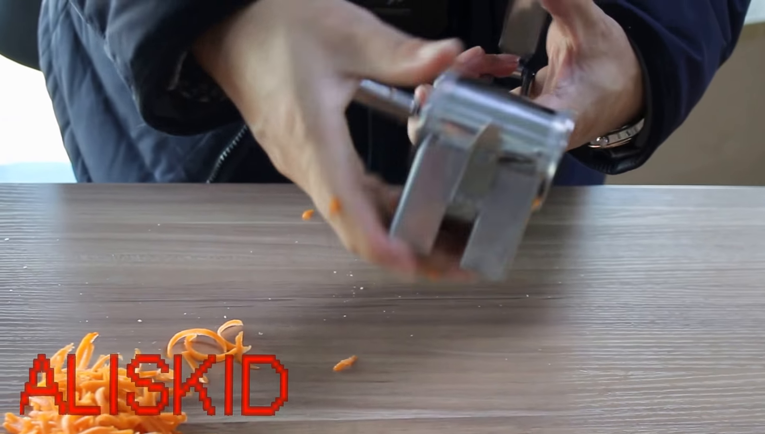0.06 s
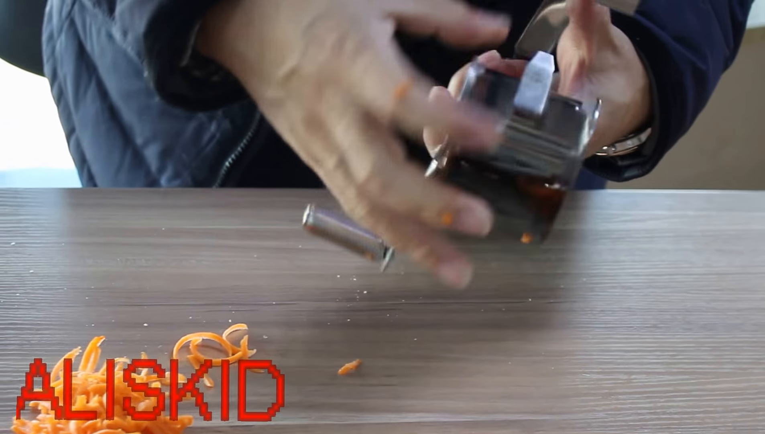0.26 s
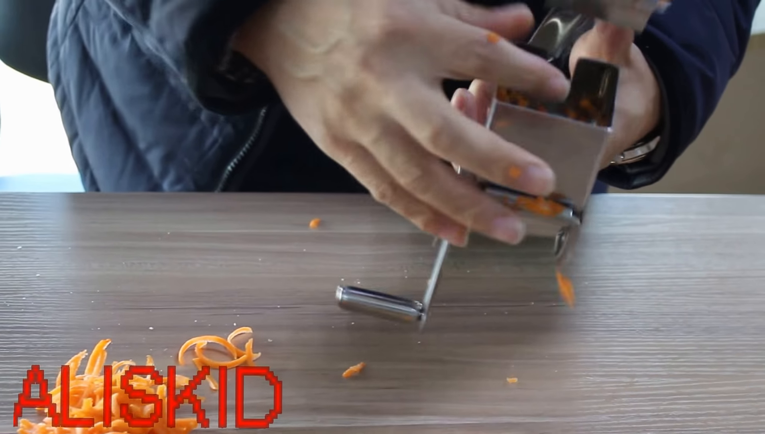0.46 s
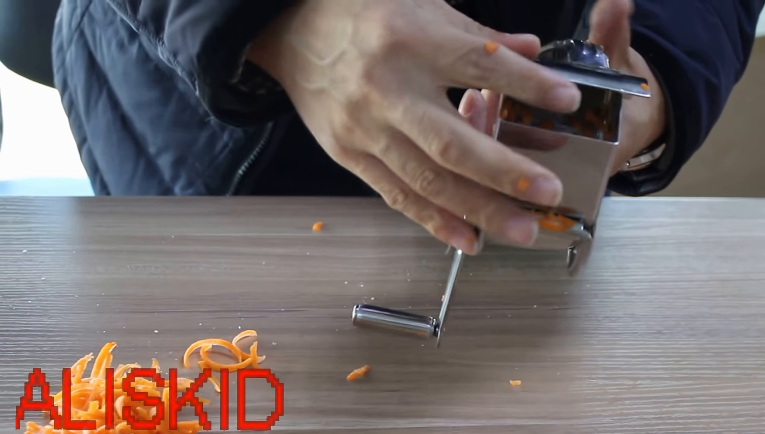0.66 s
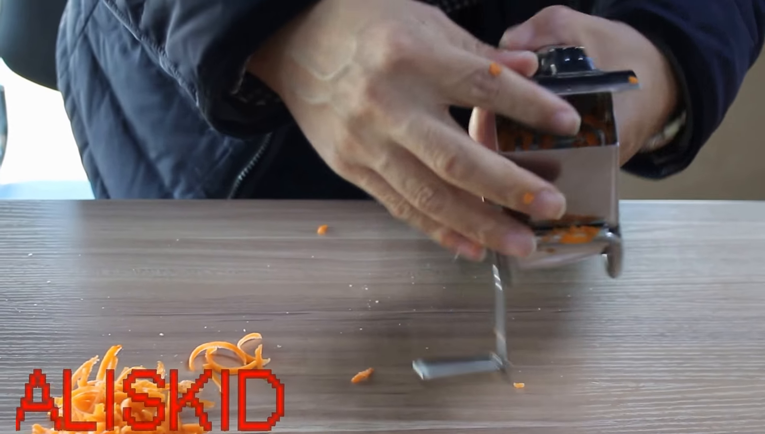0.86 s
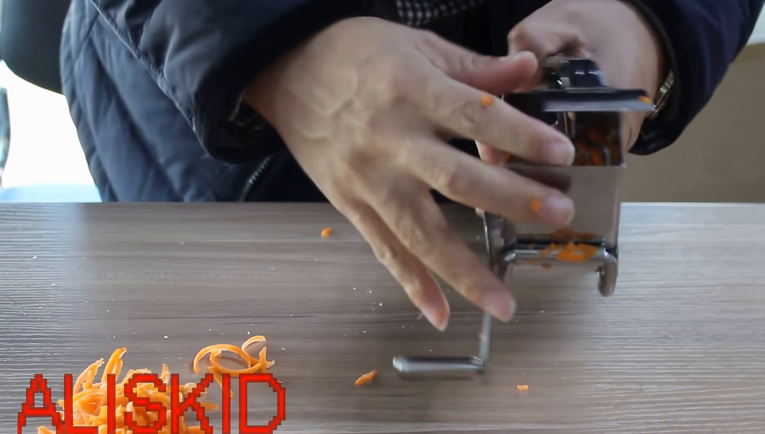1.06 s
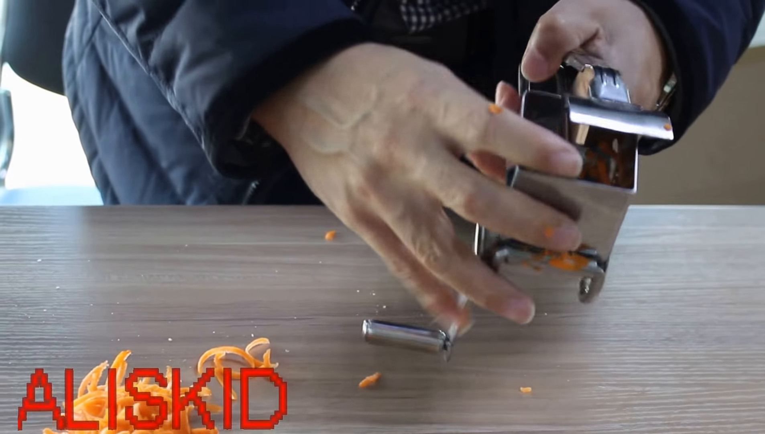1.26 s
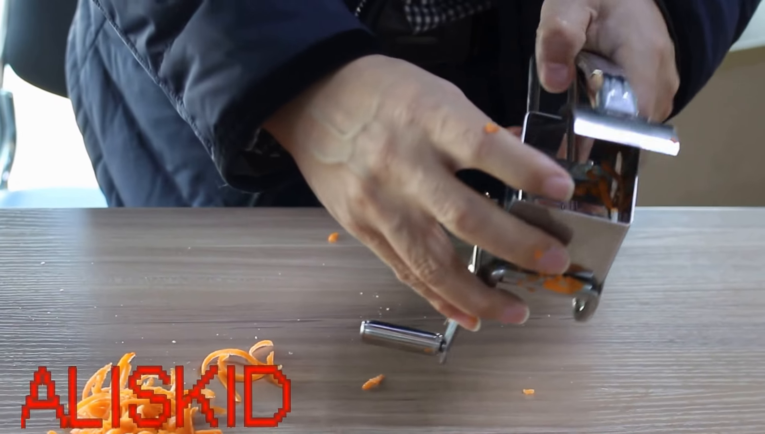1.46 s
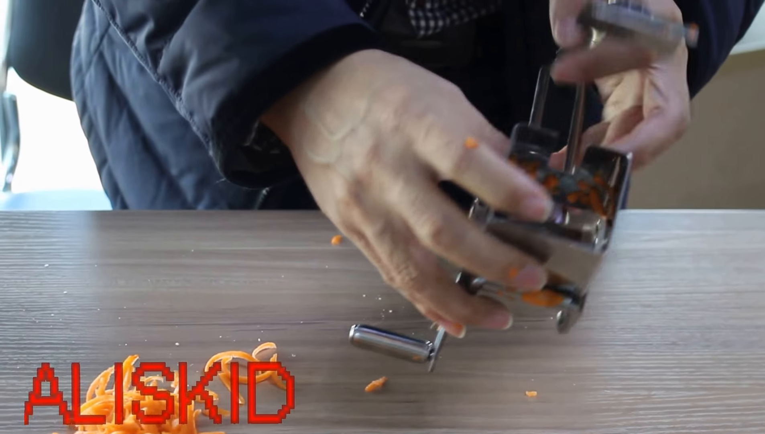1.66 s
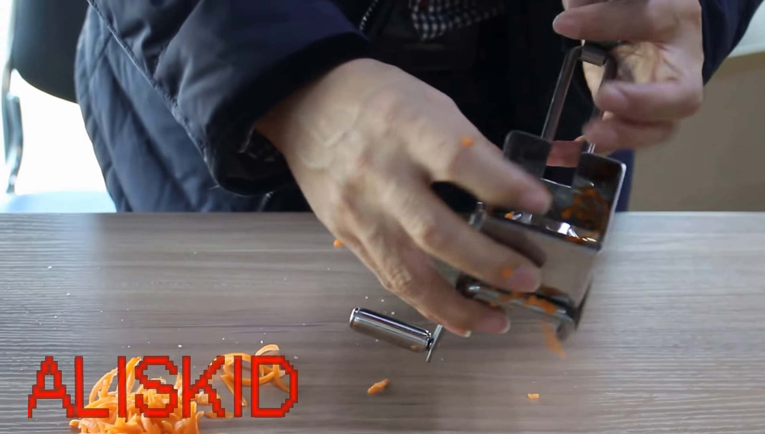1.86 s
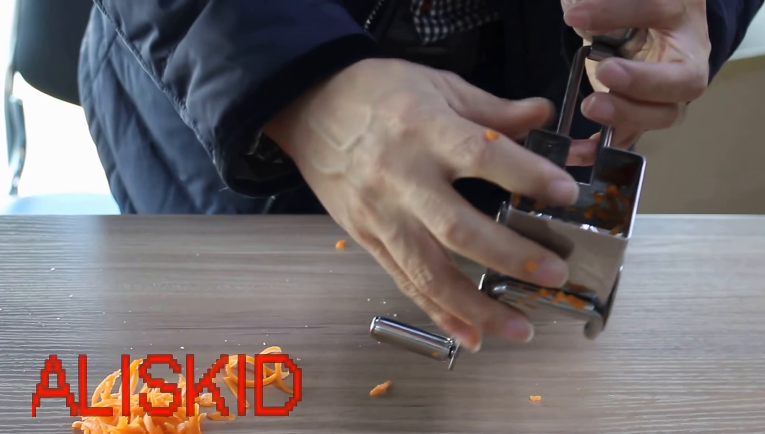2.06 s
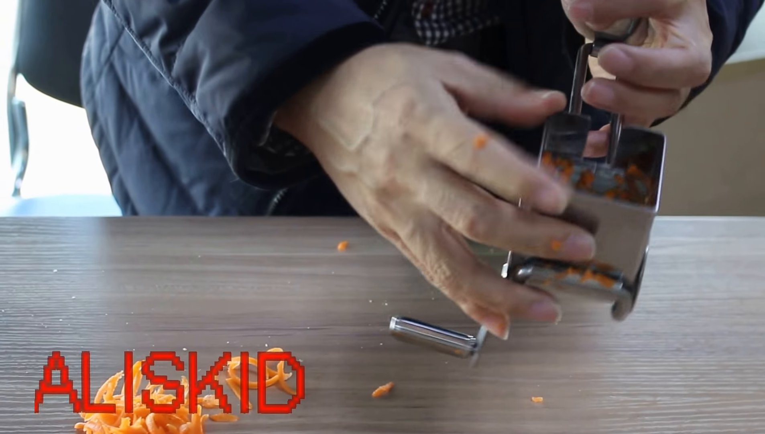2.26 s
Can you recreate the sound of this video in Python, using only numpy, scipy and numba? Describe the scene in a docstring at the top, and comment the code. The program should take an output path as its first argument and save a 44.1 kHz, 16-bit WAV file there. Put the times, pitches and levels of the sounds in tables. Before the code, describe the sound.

Loose metal parts of a hand grater clatter in a quick, ringing burst, settle into soft ticks, then clink again more lightly as it opens. The sound is near, with a short room echo and a low ventilation hum behind.

```python
"""A steel rotary grater is turned over in the hands and opened in a small, live room.
Loose crank and drum clank against the sheet-metal housing; the hinged presser then clinks as it lifts.
Each blow is a contact crack, a shimmer of fine sheet modes and a ring of main modes; a few also thud.
Ventilation hums behind. Gain control ducks the level after the hardest blows."""
import sys
import numpy as np
from scipy import signal
from scipy.fft import rfft, irfft
from scipy.io import wavfile
from scipy.ndimage import uniform_filter1d
from numba import njit

SR = 44100
rng = np.random.default_rng(int(sys.argv[2]) if len(sys.argv) > 2 else 0)


def master(y):
    """Save y as 16-bit WAV."""
    cut = np.clip(np.atleast_2d(y).T, -1, 1)
    pcm = np.round(cut * 32767)  # scale
    wavfile.write(sys.argv[1], SR, pcm.astype(np.int16))


N = 101429

# Blows: t/s, crack/dB, shimmer/dB, ring/dB, favoured f/Hz, its lift/dB,
# share of ring time left by the hand, tilt/(dB/octave), chatter/s
HOUSING_BLOWS = [(.001, -46, -42, -43.5, 6944, 10.5, 0.42, 3, 0.019),
                 (.0318, -30.5, -41, -57, 7750, 17, 0.67, 0.5, 0.009),
                 (.1316, -42, -52, -54.5, 2133, 13.5, 0.16, -7, .002),
                 (.1695, -34, -44.5, -66, 4380, 3, .5, -3, 0.00057),
                 (.185, -28, -34, -42.5, 1690, 16, 0.95, -7, 0.0055),
                 (.1895, -28, -33, -47.5, 4400, 21.5, 0.84, 7.5, 0.0021),
                 (.2335, -30, -27, -34.5, 2981, 15, 0.62, 4, 0.0068),
                 (.2375, -27, -24, -29, 2133, 5, 1, -3, 0.011),
                 (.2843, -2, -13.5, -18.5, 3409, 23, 0.43, 2.5, .003),
                 (.2885, -18, -12.5, -20, 3990, 28.5, 0.6, 1.5, 0.0033),
                 (.3195, -11.5, -15, -20, 2291, 22, 0.33, 2.5, 0.01),
                 (.3681, -10, -17, -24, 1690, 11.5, 0.62, 5.5, 0.013),
                 (.381, -31, -28.5, -20.5, 3004, 14.5, 0.51, 14, 0.013),
                 (.412, -30, -18, -29, 2840, 18, 0.24, 1.5, .02),
                 (.453, -30, -27, -32, 3409, 1, .7, -9, 0.0073),
                 (.4713, 3.5, -22, -21, 6010, 7.5, 0.14, 2.5, .001),
                 (.4722, -4, -29, -9.5, 2603, 8, 0.2, 0, 0.0009),
                 (.473, -1, -23, -17, 2133, 19, 0.15, -1.5, .002),
                 (.5207, -27, -18.5, -37.5, 2133, 19, 0.35, 2.5, .01),
                 (.5462, -12, -17.5, -33.5, 2850, 17, 0.46, 2, 0.016),
                 (.5581, -7, -20, -41, 2133, 26.5, 0.26, 0, .012),
                 (.594, -19, -35, -34, 2133, 8, 0.41, 1.5, 0.024),
                 (.645, -44, -58, -45, 2133, 21.5, 0.43, -6, 0.024),
                 (.7915, -51, -55, -56, 2800, 20, 0.42, -5, 0.0073),
                 (.8206, -30.5, -40.5, -58.5, 3409, 11.5, .4, -2.5, .003),
                 (.9004, -42, -48.5, -63, 2133, 13, .4, 0.5, .001),
                 (.9827, -31.5, -38.5, -56.5, 6930, 15.5, 0.84, 1, 0.002),
                 (.998, -30, -44.5, -64, 2870, -10, .6, 0.5, .015),
                 (1.3528, -46, -51.5, -76, 4380, 24, 0.62, -3.5, .006)]
PRESSER_BLOWS = [(1.455, -47, -50, -67, 2886, 4, 1, -14, .02), (1.4751, -52, -50, -63, 4160, 4, 1, -9, .02),
                 (1.5704, -33, -40, -39, 3990, 9.9, 0.51, 2.5, 0.0044),
                 (1.618, -36, -42, -53, 5940, 8, .6, 3, .01),
                 (1.6991, -28, -30, -33.5, 4160, 7.5, 0.86, 1, .002),
                 (1.7614, -16, -28.5, -32.5, 2910, 2.3, 1, -1, .004),
                 (1.7725, -22, -31, -47, 4730, 7.2, 0.67, -0.5, 0.0076),
                 (1.7834, -21.5, -29, -36, 2840, 3.6, 0.65, 1, .008),
                 (1.795, -27, -49, -64, 2145, 5, 0.45, 1, 0.0063),
                 (1.806, -40, -41, -35.5, 2900, 12.4, 0.12, -2, .004)]
# Main modes, parallel lists: f/Hz, level/dB, T60/s
HOUSING_HZ = [1690, 2053, 2133, 2291, 2450, 2799, 2865, 2981, 3050, 3409, 3800, 3998, 4135, 4400, 6540,
              6944, 7700, 9480]
HOUSING_DB = [-4, -19.5, 2, -7.5, -9.5, -2, 5.5, -3.5, -0.5, 1, -3.5, -16.5, -3.5, 0, 2.5, -8, 0.5, -14.5]
HOUSING_T60_S = [0.2, .33, 0.48, 0.26, 1, .33, 0.32, 0.16, .3, 0.44, 0.63, 0.32, .38, .18, .15, 0.66, 0.25,
                 .13]
PRESSER_HZ = [2145, 2520, 2840, 2886, 2928, 3045, 3420, 3835, 4010, 4160, 4486, 4813, 4967, 5980, 7130]
PRESSER_DB = [-2.5, -16, -5, 1, 2.5, -3, -5, -12, -3.5, -2, -16, -2, -6, -1.5, -11]
PRESSER_T60_S = [.3, 0.85, 0.42, 0.38, 0.23, 0.39, 0.5, .35, 0.31, 0.13, 0.6, 0.27, 0.18, 0.16, 0.19]
# Fine-mode clusters and gaps: f/Hz, width/Hz, lift/dB
HOUSING_CLUSTERS = [(1850, 190, 3), (2135, 260, 1), (2897, 340, 10.5), (3300, 37, -24), (4430, 1350, 1.5),
                    (6130, 320, 6.5), (7050, 130, 3), (9070, 840, 3.5)]
PRESSER_CLUSTERS = [(2250, 195, 9.5), (2880, 270, 14), (3150, 60, -6), (3770, 72, 8), (4240, 440, 8.5),
                    (4900, 200, 7), (5900, 340, 7), (7070, 150, 4)]
# Whole-body knocks: t/s, level/dB
KNOCKS = [(.188, -32), (.236, -28.5), (.2843, -10.5), (0.3203, -22), (0.371, -71), (0.471, -36),
          (1.7614, -36.5)]
# Spectra of contact, sheet, body and vent air: f/Hz, level/dB
CRACK_SPECTRUM = [(300, -48.5), (1100, -30.5), (1800, -0.5), (2700, -6.5), (4000, -13.5), (5200, -14),
                  (7500, -11.5), (10000, -17.5), (13500, -26), (15500, -65)]
SHIMMER_SPECTRUM = [(300, -27.5), (1200, -15.5), (1800, -6), (2900, -4.5), (4400, 0), (5400, -5),
                    (7500, -7), (10000, -20), (13500, -26), (15500, -37)]
KNOCK_SPECTRUM = [(120, -3), (300, -10), (650, 0), (1300, 7), (2500, -16.5)]
AIR_SPECTRUM = [(15, -42), (25, -20), (66, -7), (118, -4.5), (373, -15), (529, -14), (749, -19),
                (856, -15.5), (1000, -21.5), (1240, -16), (1810, -23.5), (2850, -26), (3540, -33),
                (4150, -32.5), (15000, -48.5)]
# Fan tones: f/Hz, level/dB
FAN_TONES = [(125, -53), (875.5, -53.5), (1203, -60)]

GRATER_WIDTH = 0.27  # side/mid


def steel_blows(blows, mode_hz, mode_db, mode_t60_s, clusters, size=24576):
    """Struck sheet steel: crack and shimmer chatter; modes favoured by the contact point ring most."""
    out, t, hz = np.zeros((2, N)), np.arange(size) / SR, freqs(size)
    mode_hz, mode_db, mode_t60_s = np.array([mode_hz, mode_db, mode_t60_s], float)
    cluster_db = sum(db * bell(hz - centre_hz, span_hz) for centre_hz, span_hz, db in clusters)
    ripple_db, spacing_hz = 3, 29.67
    fine_db = ripple_db * np.interp(hz / spacing_hz, np.arange(2048), rng.standard_normal(2048))
    modes = np.exp(2j * np.pi * mode_hz[:, None] * t)
    width = GRATER_WIDTH * np.sqrt(np.clip(hz / 3000, .3, 4))
    for start_s, crack_db, shimmer_db, ring_db, favoured_hz, lift_db, t60_share, tilt, chatter_s in blows:
        colour_db = cluster_db + tilt * np.log2(np.maximum(hz, 1000) / 3000)
        lean_db = 0.74 * lift_db * bell(np.log2(hz / favoured_hz), span=0.027)
        contact = noise(curve(hz, CRACK_SPECTRUM) + colour_db + lean_db, width, size)
        crack = undb(crack_db) * contact * fade(t, t60_s=0.032)
        sheet = noise(curve(hz, SHIMMER_SPECTRUM) + colour_db + fine_db, width, size)
        shimmer = undb(shimmer_db) * octave_decay(sheet, t60_s=0.34, damping=0.37)
        add(out, start_s, signal.fftconvolve(crack + shimmer, chatter(chatter_s), axes=1))

        favour_db = lift_db * bell(np.log2(mode_hz / favoured_hz), span=0.052)
        gain = undb(ring_db + mode_db + favour_db)
        phase_rad = 2 * np.pi * rng.random(len(mode_hz))
        stereo_rad = 0.124 * rng.standard_normal((2, len(mode_hz)))
        excitation = gain * np.exp(1j * (phase_rad + stereo_rad))
        damped_modes = modes * fade(t, t60_share * mode_t60_s[:, None])
        add(out, start_s, (excitation @ damped_modes).imag)
    return out


def chatter(length_s, bounces=32, reference_s=0.0068):
    """First contact plus random bounces, unit energy; longer rattles bounce harder."""
    train = np.zeros(int(length_s * SR) + 2)
    train[0] = 1
    bounce_at = 1 + (rng.random(bounces) * (len(train) - 1)).astype(int)
    train[bounce_at] = 0.21 * np.sqrt(length_s / reference_s) * rng.standard_normal(bounces)
    return train[None] / np.linalg.norm(train)


def body_knocks(size=8192):
    """The held body thuds briefly under heavier blows."""
    out = np.zeros((2, N))
    spectrum_db = curve(freqs(size), KNOCK_SPECTRUM)
    decay = fade(np.arange(size) / SR, t60_s=0.032)
    for start_s, db in KNOCKS:
        add(out, start_s, undb(db) * noise(spectrum_db, GRATER_WIDTH, size) * decay)
    return out


def room(x, level_db=-9.5, build_s=0.016, size=32768):
    """Diffuse echo of hard walls, different at each ear."""
    tail = octave_decay(noise(0, width=0.67, size=size), t60_s=0.44, damping=0.16)
    tail *= np.minimum(np.arange(size) / SR / build_s, 1)
    tail /= np.sqrt(np.sum(tail ** 2) / 2)
    return undb(level_db) * signal.fftconvolve(x, tail, axes=1)[:, :N]


def ventilation(air_db=-44, waver_hz=7, waver_depth=0.27, drift_rad=0.54):
    """Low rush of air plus fan tones wavering in level and phase."""
    t, hz = np.arange(N) / SR, freqs(N)
    air_width = 0.31 * np.clip(hz / 200, .6, 1.6)
    out = undb(air_db) * noise(curve(hz, AIR_SPECTRUM), air_width, N)
    lowpass_db = -20 * np.log10(1 + (hz / waver_hz) ** 2)
    for tone_hz, db in FAN_TONES:
        swell, drift = noise(lowpass_db, width=0.79, size=N)
        tone = np.sqrt(2) * np.sin(2 * np.pi * tone_hz * t + drift_rad * drift)
        out += undb(db) * (1 + waver_depth * swell) * tone
    return out


def undb(db):
    """dB to gain."""
    return 10 ** (np.asarray(db) / 20)


def bell(offset, span):
    """Gaussian, 1/e at offset = span."""
    return np.exp(-(offset / span) ** 2)


def fade(t, t60_s):
    """Exponential decay, -60 dB at t60_s."""
    return np.exp(-np.log(1000) * t / t60_s)


def freqs(size):
    """Bin frequencies in Hz, floored at 1."""
    return np.maximum(np.arange(size // 2 + 1) * SR / size, 1)


def curve(hz, points):
    """Interpolate (f/Hz, level/dB) points over log f."""
    point_hz, db = np.array(points, float).T
    return np.interp(np.log(hz), np.log(point_hz), db)


def noise(spectrum_db, width, size):
    """Shaped stereo noise, rms 1; width = side/mid."""
    mid, side = rfft(rng.standard_normal((2, size)))
    stereo = mid + np.array([[1], [-1]]) * width * side
    x = irfft(stereo * undb(spectrum_db), size)
    return x / np.sqrt(np.mean(x ** 2))


def octave_decay(x, t60_s, damping):
    """Decay in four bands: t60_s at 3 kHz, halved `damping` times per octave up."""
    size = x.shape[-1]
    t, spectrum = np.arange(size) / SR, rfft(x)
    octave = np.clip(np.log2(freqs(size) / 3000), -1, 2)
    out = np.zeros_like(x)
    for k in range(-1, 3):
        band = irfft(spectrum * np.maximum(1 - abs(octave - k), 0), size)
        out += band * fade(t, t60_s * 2 ** (-damping * k))
    return out


def add(out, start_s, x):
    """Mix x into out at start_s."""
    i = int(start_s * SR)
    out[:, i:i + x.shape[1]] += x[:, :N - i]


@njit
def follow(x, attack_s, release_s):
    """Envelope follower."""
    out, level = np.empty(len(x)), 0.
    for i in range(len(x)):
        level += (x[i] - level) / (SR * (attack_s if x[i] > level else release_s))
        out[i] = level
    return out


def scene(pan_db=0.45):
    """Grater, room and ventilation, all just right of centre."""
    housing = steel_blows(HOUSING_BLOWS, HOUSING_HZ, HOUSING_DB, HOUSING_T60_S, HOUSING_CLUSTERS)
    presser = steel_blows(PRESSER_BLOWS, PRESSER_HZ, PRESSER_DB, PRESSER_T60_S, PRESSER_CLUSTERS)
    grater = housing + presser + body_knocks()
    return (grater + room(grater) + ventilation()) * undb([[-pan_db], [pan_db]])


def record(dry):
    """Look-ahead gain control ducks after loud blows; then full-scale clip and low-pass."""
    threshold_db, slope, ahead_s, cutoff_hz = -13.5, 0.64, 0.002, 15200
    ahead = int(ahead_s * SR)
    peak = np.roll(abs(dry).max(axis=0), -ahead)
    envelope = follow(peak, attack_s=0.0027, release_s=0.12)
    excess = np.maximum(envelope / undb(threshold_db), 1)
    gain = uniform_filter1d(excess ** -slope, ahead)
    lowpass = signal.ellip(8, .2, 70, cutoff_hz, fs=SR, output="sos")
    return signal.sosfilt(lowpass, np.clip(dry * gain, -1, 1))


dry = scene()
out = record(dry)
master(out)
```